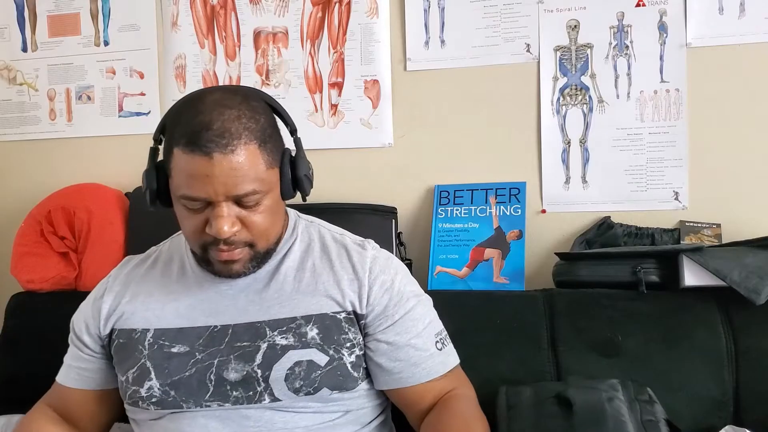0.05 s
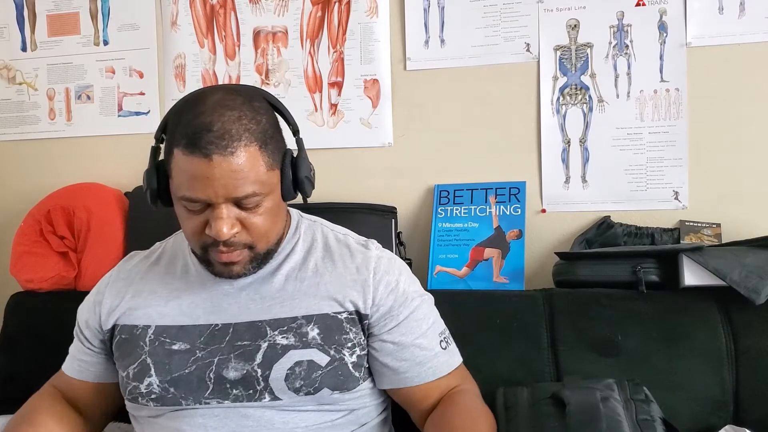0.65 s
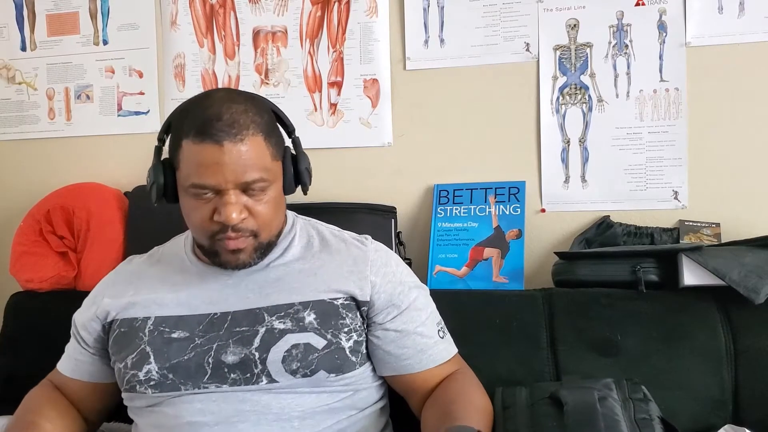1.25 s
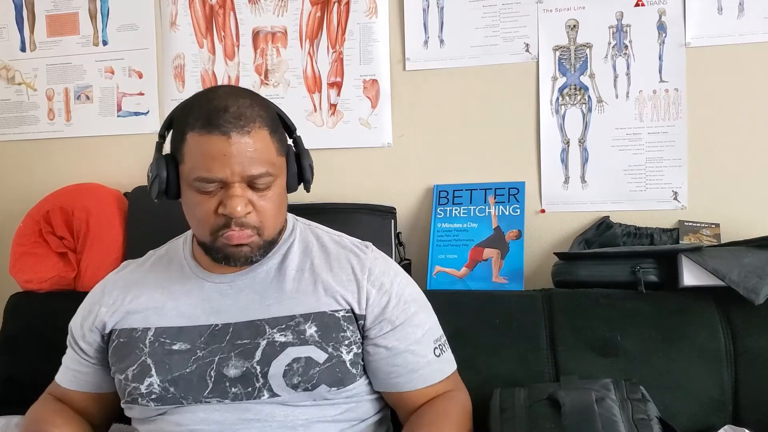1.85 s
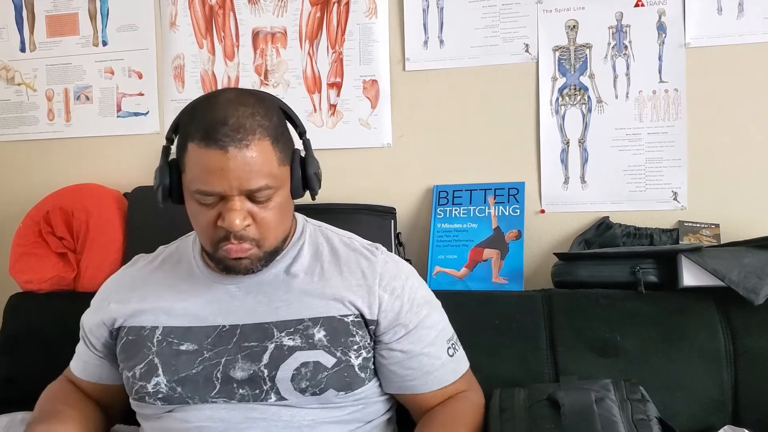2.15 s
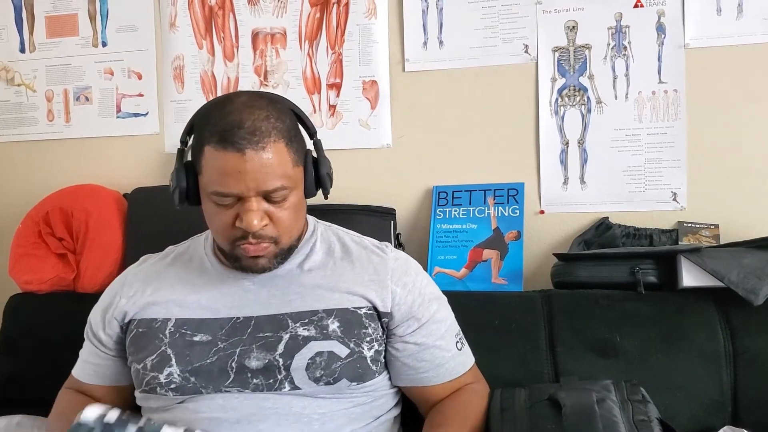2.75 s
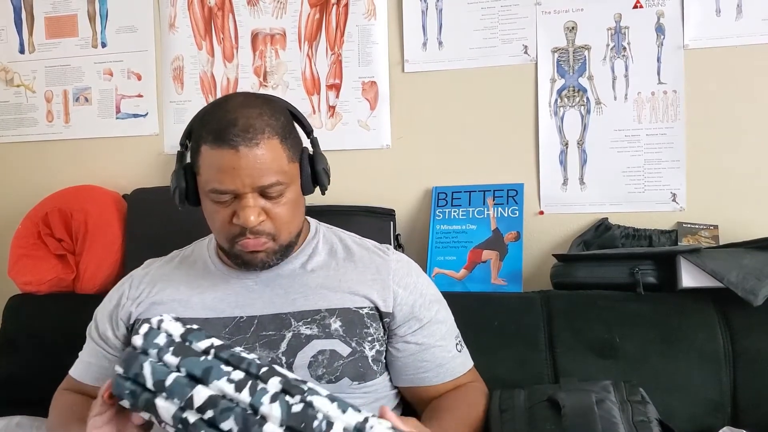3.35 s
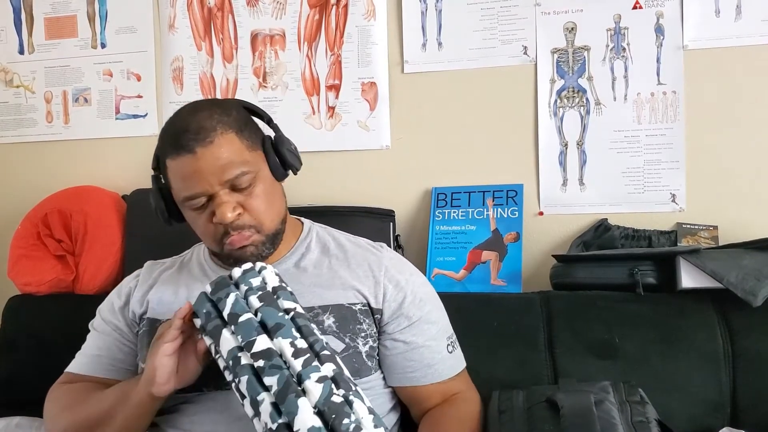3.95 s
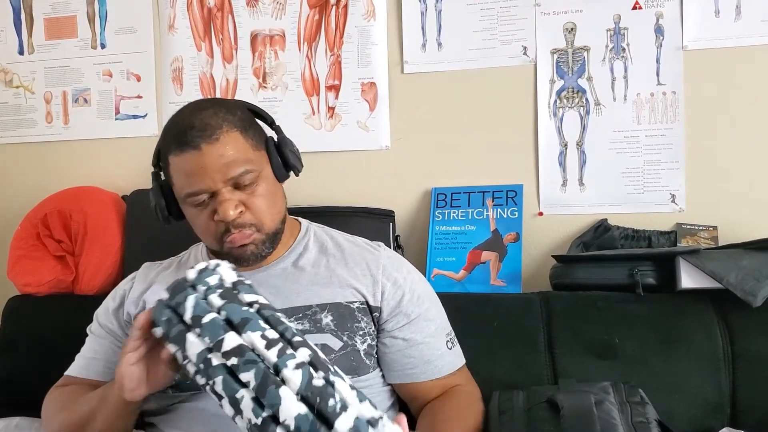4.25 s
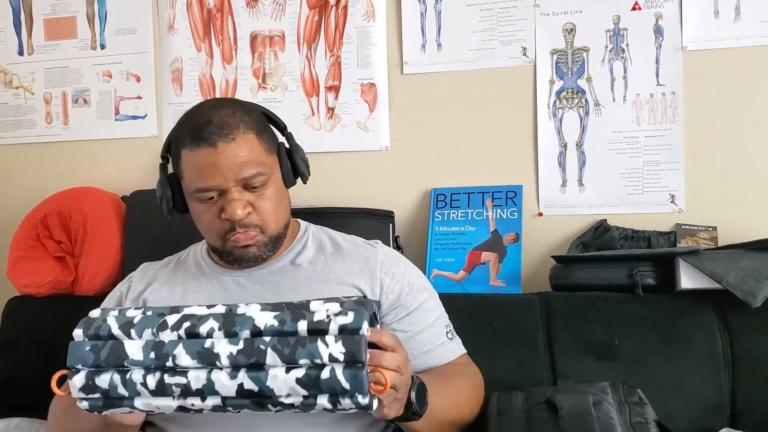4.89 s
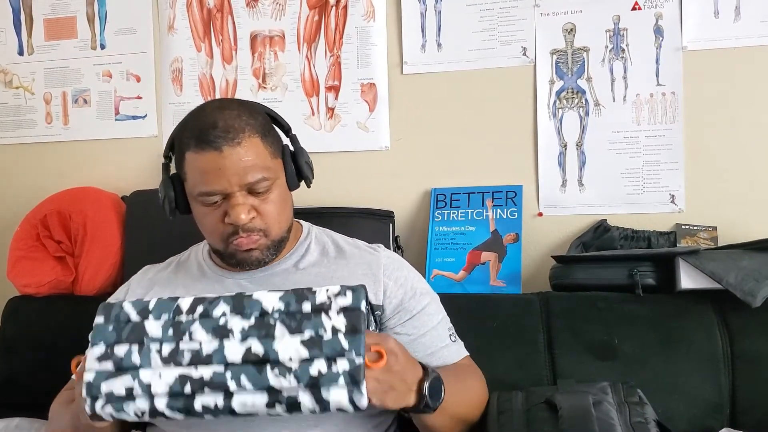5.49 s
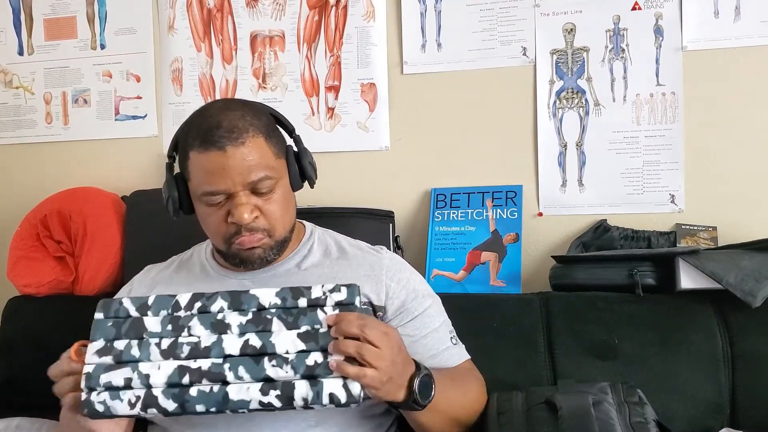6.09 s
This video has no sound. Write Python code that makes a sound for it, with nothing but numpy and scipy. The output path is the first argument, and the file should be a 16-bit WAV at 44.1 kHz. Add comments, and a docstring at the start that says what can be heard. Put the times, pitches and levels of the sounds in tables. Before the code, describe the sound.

Close up in a small, quietly humming room, hands handle a foam roller. It starts with a soft knock and brushing, then come scattered finger taps, faint scuffs of skin and swishes of cloth. After a quieter stretch, a loud, quick cluster of hollow slaps sounds as the roller is caught between the palms. Two soft knocks and a little more rubbing follow.

```python
"""Handling a hollow foam roller.

The roller is picked up and turned over by hand in a small room. Skin and cloth rub over the foam,
fingers tap and the stiff core clicks; a quick thud, smack and slap ring the tube as it is caught
between the palms, and two soft knocks follow over a low room hum."""
import sys
import numpy as np
from scipy import signal
from scipy.fft import rfft, irfft
from scipy.io import wavfile
from scipy.ndimage import uniform_filter1d

SR = 44100
rng = np.random.default_rng(int(sys.argv[2]) if len(sys.argv) > 2 else 0)


def generate_wav(sig):
    """Save sig (samples, or channels by samples) to the path in sys.argv[1] as 16-bit PCM at SR."""
    pcm = np.round(np.clip(np.atleast_2d(sig).T, -1, 1) * 32767).astype(np.int16)
    wavfile.write(sys.argv[1], SR, pcm)


N = 274698
SIZE = 32768  # samples per impulse response


# tube wall and bore modes: pitch_hz, width_hz, level_db
TUBE_MODES = [(368, 13.3, 4.5), (481, 110, -11.5), (560, 58, -1), (626.5, 31, 1), (754, 50, 2.5),
              (884, 56, -1), (1136, 240, -9), (1370, 170, -13.5)]
# stiff core modes: pitch_hz, width_hz, level_db
CORE_MODES = [(1470, 79, -7.5), (1667, 27, -5), (1810, 26, -7), (1900, 23, -19.5), (2254, 40, -8.5),
              (2604, 40, -7), (2890, 70, -11), (3240, 83, -4.5), (4160, 26, -1), (4590, 210, -8),
              (5610, 46, -1), (6660, 33, -2)]
# foam thump spectrum: freq_hz, level_db
THUMP_SPECTRUM = [(25, -31.5), (60, -25.5), (100, -3.5), (160, -6.5), (205, 7.5), (255, 10.5), (330, -13),
                  (500, -15), (1200, -58)]
# core crack spectrum: freq_hz, level_db
CRACK_SPECTRUM = [(500, -29), (1000, -1), (1400, -8.5), (1650, 3), (2300, 1.5), (2800, 1), (3400, 1),
                  (4700, 1), (6700, -5), (8200, -14.5), (16000, -18)]
# skin snap spectrum: freq_hz, level_db
SNAP_SPECTRUM = [(2500, -57.5), (6500, 6), (8500, 0.5), (10500, 1.5), (13500, 2.5), (16000, -8.5)]

def blows(touches, pocket_q=4.03, leak_hz=2200, ring_s=0.022, core_db=4, pocket_room_db=-4.0):
    """Each touch pops trapped air, thumps the foam, rings the tube, cracks the core and snaps the skin."""
    tube = sum(undb(db) * resonance(hz, width_hz) for hz, width_hz, db in TUBE_MODES)
    core = sum(undb(db) * resonance(hz, width_hz) for hz, width_hz, db in CORE_MODES)
    thump, crack, snap = (colour(curve, SIZE) for curve in (THUMP_SPECTRUM, CRACK_SPECTRUM, SNAP_SPECTRUM))
    out = np.zeros((2, N + SIZE))
    for start_s, pocket_hz, *levels_db, hardness_hz, settle_s, room_db in touches:
        touch = contact(settle_s)
        echoes = undb(room_db) * room_tail()
        path = touch + echoes
        # small, high air pockets leak and ring less
        width_hz = pocket_hz / pocket_q * np.hypot(1, pocket_hz / leak_hz)
        pocket = resonance(pocket_hz, width_hz) ** 2 * (touch + undb(pocket_room_db) * echoes)
        # soft contact reaches only the lower modes
        clack = crack * (1 + undb(core_db) * core) / (1 + 1j * bins(SIZE) / hardness_hz) ** 2
        start = int(start_s * SR)
        for part, db in zip((pocket, thump * path, tube * path, clack * path, snap * path), levels_db):
            ring = irfft(part)
            out[:, start:start + SIZE] += ring * undb(db) * np.sqrt(ring_s * SR / SIZE) / rms(ring)
    return out[:, :N]


def contact(settle_s, push_db=-11, weight_hz=650):
    """Spectrum of a touch: the hand's bass-heavy push, plus tiny impacts as the foam's ridges settle."""
    t = np.arange(SIZE) / SR
    flurry = diffuse(SIZE) * np.exp(-t / settle_s) * (1 - np.exp(-t / (.15 * settle_s)))
    ridges = rfft(flurry)
    push = undb(push_db) * (1 + 6 / (1 + 1j * bins(SIZE) / weight_hz) ** 2)
    touch = push + ridges / rms(abs(ridges))
    return touch / rms(abs(touch))


# palm impacts: start_s, pocket_hz, pocket_db, thump_db, tube_db, crack_db, snap_db,
# hardness_hz, settle_s, room_db
PALM_HITS = [(5.066, 1160, -54, -39, -45, -31, -59, 1774, 0.0036, 11),
             (5.071, 283.4, -17.5, -23, -25.5, -57, -37, 6000, 0.0023, 0),
             (5.114, 1995, -23.5, -27, -32, -21, -35.5, 2500, 0.0095, -2.5),
             (5.186, 964, -32.5, -45.5, -28.5, -24.5, -38, 2000, 0.015, 6),
             (5.207, 684, -20.5, -66.5, -18, -17, -21, 6000, 0.0071, 3.5)]

def catch():
    """The palms close on the roller in a quick run of blows."""
    return blows(PALM_HITS)


# hand knocks: start_s, tube_db, pocket_hz, pocket_db, settle_s
HAND_KNOCKS = [(.001, -35.5, 767, -47.5, 0.006), (.095, -45, 423, -54, 0.011),
               (0.157, -57, 403, -56, 0.014), (0.227, -53, 297, -48, 0.0068),
               (0.245, -48, 304, -43.5, .008), (.823, -54, 438, -53, .012), (5.575, -54, 450, -56, 0.0083),
               (5.805, -59, 292, -50.5, 0.0058), (5.873, -37.5, 470, -39, 0.0068),
               (5.887, -34, 484, -34.5, 0.012), (5.979, -35.5, 460, -42, 0.0072),
               (5.994, -42.5, 530, -34.5, 0.01)]

def knocks(thump_db=-12, crack_db=-9, snap_db=-19, hardness_hz=2300, room_db=-2.5):
    """Soft knocks of a hand ring the tube more than the core."""
    return blows((start_s, pocket_hz, pocket_db, db + thump_db, db, db + crack_db, db + snap_db,
                  hardness_hz, settle_s, room_db)
                 for start_s, db, pocket_hz, pocket_db, settle_s in HAND_KNOCKS)


# finger taps: start_s, crack_db, pocket_hz, pocket_db, settle_s, snap_db
FINGER_TAPS = [(.263, -36, 310, -39, 0.00098, -53), (0.27, -52, 3500, -39.5, 0.0063, -74),
               (1.366, -37, 905, -52, 0.0014, -71), (1.373, -40.5, 2300, -43.5, .008, -72),
               (2.126, -58, 1360, -50, 0.02, -81), (2.267, -50.5, 1200, -54, 0.0033, -81),
               (2.398, -57, 1600, -54, 0.0048, -78), (2.57, -50, 2650, -43.5, 0.014, -71),
               (2.719, -45, 2760, -45.5, 0.0046, -56.5), (2.73, -44, 3880, -47, 0.0095, -70),
               (3.085, -36, 3100, -42.5, 0.0078, -63)]

def taps(thump_db=-24, tube_db=-16, hardness_hz=7000, room_db=-3.5):
    """Fingertips click the stiff core."""
    return blows((start_s, pocket_hz, pocket_db, db + thump_db, db + tube_db, db, snap_db,
                  hardness_hz, settle_s, room_db)
                 for start_s, db, pocket_hz, pocket_db, settle_s, snap_db in FINGER_TAPS)


# skin releases: start_s, snap_db, pocket_hz, pocket_db, settle_s, crack_db
SKIN_PEELS = [(1.285, -50, 468, -46.5, 0.01, -42), (2.545, -47.5, 274, -44.5, 0.0058, -45.5),
              (5.502, -47, 390, -52.5, 0.00065, -52.5), (5.835, -42, 440, -52, 0.003, -40.5)]

def peels(thump_db=-20, tube_db=-4, hardness_hz=8500, room_db=-4):
    """Sticky skin snaps off the foam."""
    return blows((start_s, pocket_hz, pocket_db, db + thump_db, db + tube_db, db, snap_db,
                  hardness_hz, settle_s, room_db)
                 for start_s, snap_db, pocket_hz, pocket_db, settle_s, db in SKIN_PEELS)


# smooth cloth strokes: peak_s, length_s, level_db
CLOTH_SWISHES = [(.01, 0.043, -52.5), (.16, .055, -57), (.34, 0.11, -71), (.54, 0.043, -70),
                 (.705, 0.056, -55), (.78, 0.16, -69), (1.05, 0.086, -80.5), (1.22, 0.047, -79),
                 (1.47, .1, -73), (1.585, 0.095, -63.5), (1.85, 0.042, -61), (2.02, 0.11, -65.5),
                 (2.11, 0.079, -64), (2.24, 0.088, -64), (2.41, 0.18, -68), (2.55, 0.043, -50.5),
                 (3.21, .05, -62.5), (3.36, 0.15, -73), (3.6, 0.056, -67.5), (3.67, 0.072, -67.5),
                 (4.12, 0.068, -86), (4.43, 0.096, -65), (4.54, 0.11, -68.5), (4.71, .04, -71),
                 (5.525, .045, -65), (5.86, 0.053, -59), (6.03, 0.07, -63)]
# grainy skin strokes: peak_s, length_s, level_db
SKIN_SCUFFS = [(.05, 0.13, -51.5), (.165, .04, -48), (.25, 0.066, -50), (.355, 0.023, -59),
               (.55, 0.096, -69), (.72, .07, -80), (.89, 0.21, -63.5), (1.32, 0.085, -52), (1.44, .08, -72),
               (1.6, 0.17, -65), (1.85, 0.12, -60), (2.03, 0.081, -62), (2.135, 0.047, -55),
               (2.315, 0.078, -58.5), (2.41, 0.074, -56.5), (2.585, 0.043, -54), (2.76, 0.056, -50.5),
               (2.84, 0.035, -57.5), (3, 0.18, -68.5), (3.17, 0.14, -58.5), (3.5, 0.093, -61.5),
               (4.42, 0.032, -52), (4.48, 0.11, -62), (4.73, 0.092, -65), (5.1, 0.062, -48),
               (5.53, 0.057, -51), (5.625, .022, -52.5), (5.665, 0.028, -53.5), (5.75, 0.045, -56),
               (6.05, 0.073, -59.5)]
# friction spectrum: freq_hz, level_db
RUB_SPECTRUM = [(40, -9.5), (90, 2), (170, 0), (300, -3.5), (600, -2.5), (1400, -3), (2000, 0), (3400, 0.5),
                (4800, -1.5), (6600, -4.5), (8200, -17), (16000, -43)]
# cloth hiss spectrum: freq_hz, level_db
HISS_SPECTRUM = [(1500, -18), (3200, -1), (6500, 1.5), (8200, -2), (11000, -1), (14000, 0.5), (15800, -3),
                 (17000, -30)]

def rubbing(slips_per_s=700, grain_db=1.0, grain_gain=0.48, uneven_db=1.6, rub_db=3.0, hiss_db=5,
            swish_rub_db=2.0, scuff_hiss_db=-16, resting_rub_db=-84, resting_hiss_db=-94):
    """Skin grates over the foam in tiny slips, cloth also hisses; resting hands are never quite still."""
    swish, scuff = strokes(CLOTH_SWISHES), strokes(SKIN_SCUFFS)
    rub_level = np.sqrt(scuff ** 2 + (undb(swish_rub_db) * swish) ** 2 + undb(resting_rub_db) ** 2)
    hiss_level = np.sqrt(swish ** 2 + (undb(scuff_hiss_db) * scuff) ** 2 + undb(resting_hiss_db) ** 2)
    sizes = undb(grain_db * np.minimum(rng.exponential(size=N), 5)) * rng.standard_normal(N)
    slips = sizes * (rng.random(N) < slips_per_s / SR)
    slip_response = irfft(contact(settle_s=0.0016) + room_tail())
    grains = signal.fftconvolve(slips[None], slip_response, axes=1)[:, :N]
    friction = grain_gain * grains / rms(grains) + .5 * diffuse(N)
    friction *= undb(uneven_db * walk(rate_hz=39))
    hiss = shaped(diffuse(N), HISS_SPECTRUM)
    return undb(rub_db) * rub_level * shaped(friction, RUB_SPECTRUM) + undb(hiss_db) * hiss_level * hiss


def strokes(table, rise_share=0.54, fall_share=0.56):
    """Stroke envelope: each swells to its fastest moment and eases off a little more slowly."""
    t, power = np.arange(N) / SR, np.zeros(N)
    for peak_s, length_s, db in table:
        near = abs(t - peak_s) < 4 * length_s
        along = (t[near] - peak_s) / length_s
        power[near] += (2 * undb(db) / (np.exp(-along / rise_share) + np.exp(along / fall_share))) ** 2
    return np.sqrt(power)


def room_tail(build_s=0.0082, split_hz=450, low_t60_s=0.33, high_t60_s=0.29):
    """Spectrum of the room's echoes at unit energy; the bass lingers."""
    t = np.arange(SIZE) / SR
    noise = diffuse(SIZE) * (1 - np.exp(-(t / build_s) ** 2))
    bass = 1 / (1 + 1j * bins(SIZE) / split_hz)
    low, high = (rfft(noise * np.exp(-np.log(1000) * t / t60_s)) for t60_s in (low_t60_s, high_t60_s))
    tail = low * bass + high * (1 - bass)
    return tail / rms(abs(tail))


# room hum spectrum: freq_hz, level_db
HUM_SPECTRUM = [(25, -24.5), (45, -11), (58, -0.5), (72, -5.5), (95, 2), (120, -8), (210, -6.5),
                (290, -14.5), (400, -12.5), (900, -19.5), (1200, -27.5), (2050, -24), (2500, -40),
                (16000, -50)]

def hum(level_db=-57.5, waver_db=0.16, stereo_spread=0.44):
    """The room's low, slightly wavering background noise."""
    air = diffuse(N) + stereo_spread * rng.standard_normal((2, N))
    return undb(level_db + waver_db * walk(rate_hz=19)) * shaped(air, HUM_SPECTRUM)


def undb(db):
    """Decibels to gain."""
    return 10 ** (np.asarray(db) / 20)


def rms(x):
    """Root mean square."""
    return np.sqrt(np.mean(x ** 2))


def bins(size):
    """FFT bin frequencies in Hz, floored at 1."""
    return np.maximum(np.arange(size // 2 + 1) * SR / size, 1)


def colour(points, size):
    """Minimum-phase response through (freq_hz, level_db) points."""
    hz, db = np.transpose(points)
    gain = undb(np.interp(np.log(bins(size)), np.log(hz), db))
    cepstrum = irfft(np.log(gain), size)
    cepstrum[1:size // 2] *= 2
    cepstrum[size // 2 + 1:] = 0
    return np.exp(rfft(cepstrum))


def shaped(x, points):
    """Signal filtered by a spectrum, at unit RMS."""
    y = irfft(rfft(x, 2 * N) * colour(points, 2 * N))[:, :N]
    return y / rms(y)


def resonance(hz, width_hz):
    """One damped mode, gain 1 at its centre."""
    f = bins(SIZE)
    return 1 / (1 + 1j * (f * f - hz * hz) / (f * width_hz))


def diffuse(size, coherent_hz=800):
    """Noise at two close microphones: shared in the bass, unrelated in the treble."""
    coherence = .06 + .87 / (1 + (bins(size) / coherent_hz) ** 4)
    mid, side = np.exp(2j * np.pi * rng.random((2, size // 2 + 1)))
    mid, side = mid * np.sqrt(1 + coherence), side * np.sqrt(1 - coherence)
    noise = irfft(np.array([mid + side, mid - side]), size)
    return noise / rms(noise)


def walk(rate_hz):
    """Random steps smoothed twice, at unit RMS."""
    hold = int(SR / rate_hz)
    steps = np.repeat(rng.standard_normal(N // hold + 1), hold)
    drift = uniform_filter1d(uniform_filter1d(steps, hold), hold)[:N]
    return drift / rms(drift)


def scene():
    """Blows and rubbing over the hum."""
    return catch() + knocks() + taps() + peels() + rubbing() + hum()


# microphone balance: freq_hz, left_minus_right_db
MIC_BALANCE = [(100, 0), (700, 0.5), (1400, 0.3), (3000, 1), (6000, -1.5), (9500, 8), (14000, 2)]

def record(dry, right_lag_s=.0001, top_hz=16000):
    """The left microphone is a little nearer and brighter than the right; the top is cut."""
    hz, db = np.transpose(MIC_BALANCE)
    f = bins(2 * N)
    tilt_db = np.interp(np.log(f), np.log(hz), db) * np.array([[.5], [-.5]])
    lag = np.exp(-2j * np.pi * f * right_lag_s * np.array([[0], [1]]))
    heard = irfft(rfft(dry, 2 * N) * undb(tilt_db) * lag)[:, :N]
    return signal.sosfilt(signal.ellip(8, .2, 70, top_hz, fs=SR, output="sos"), heard)


dry = scene()
out = record(dry)
generate_wav(out)
```